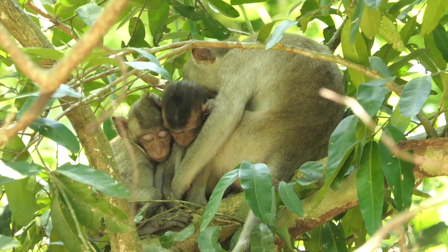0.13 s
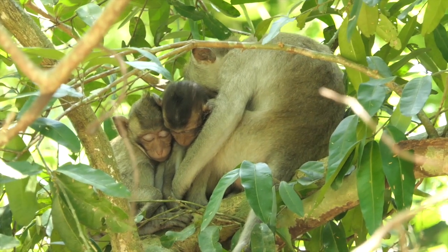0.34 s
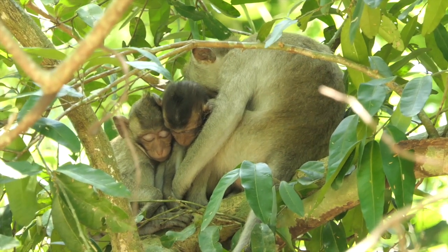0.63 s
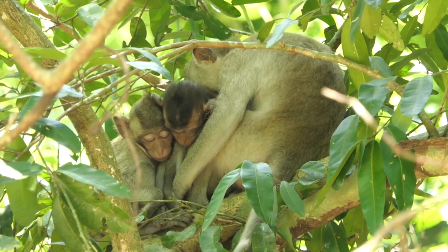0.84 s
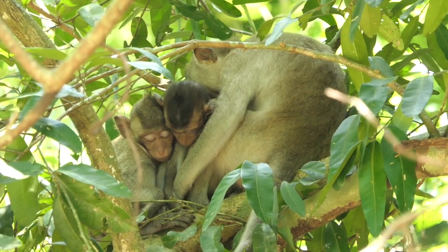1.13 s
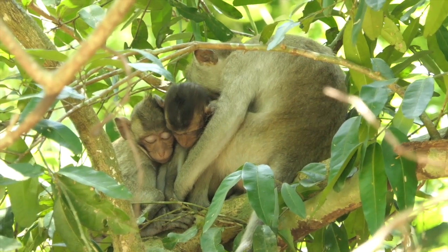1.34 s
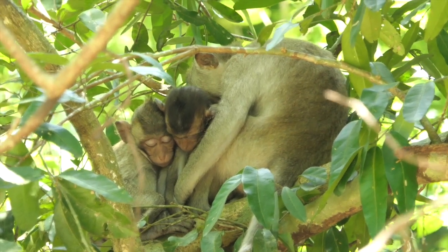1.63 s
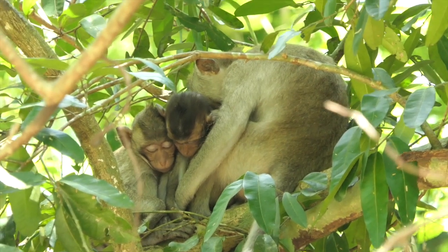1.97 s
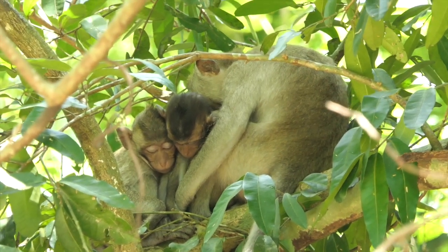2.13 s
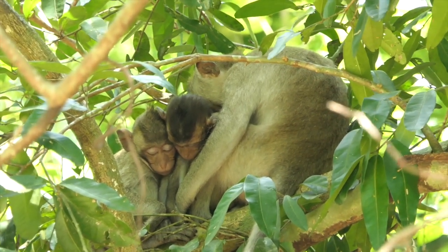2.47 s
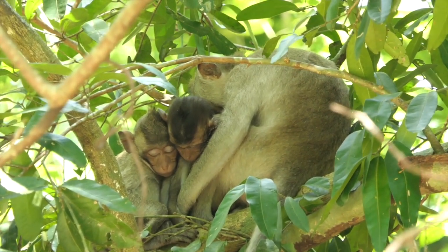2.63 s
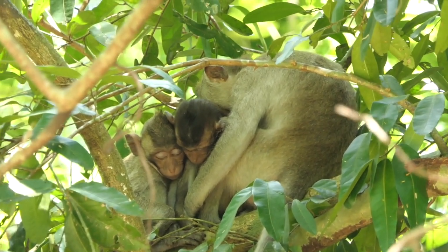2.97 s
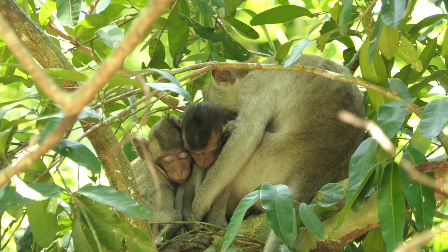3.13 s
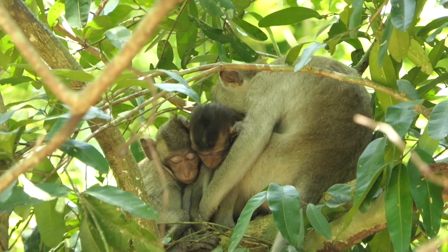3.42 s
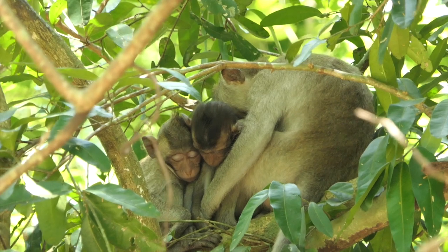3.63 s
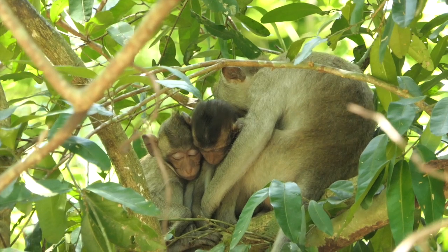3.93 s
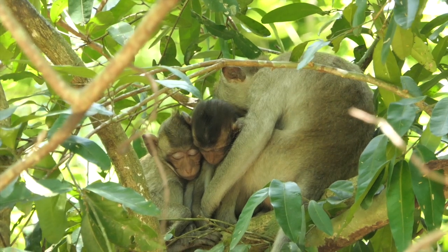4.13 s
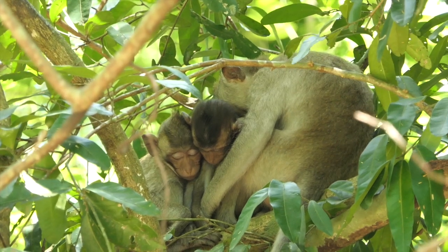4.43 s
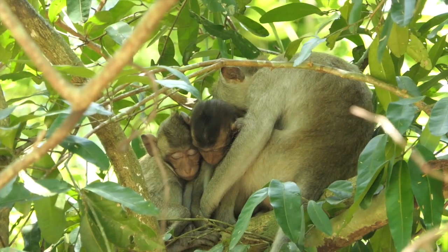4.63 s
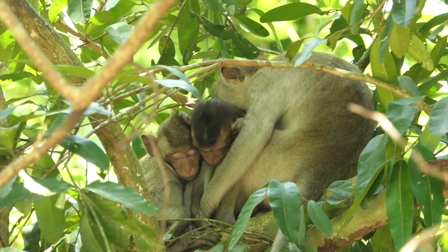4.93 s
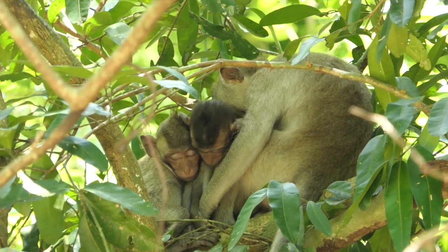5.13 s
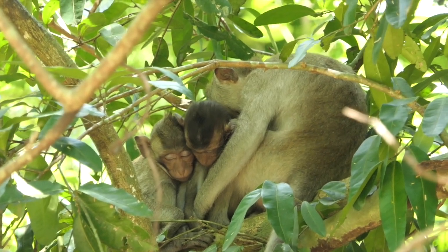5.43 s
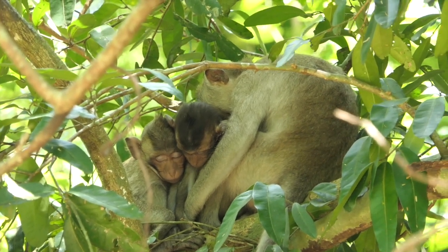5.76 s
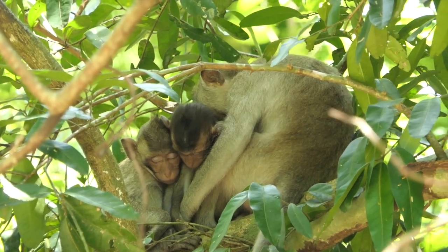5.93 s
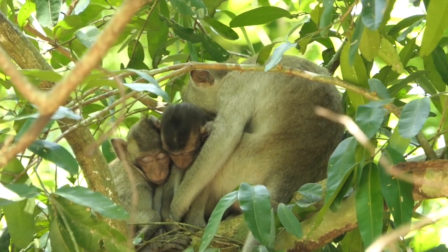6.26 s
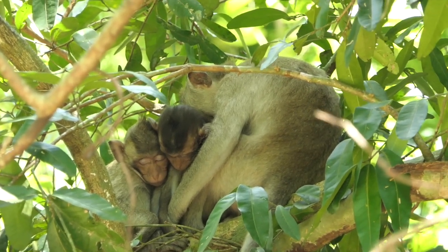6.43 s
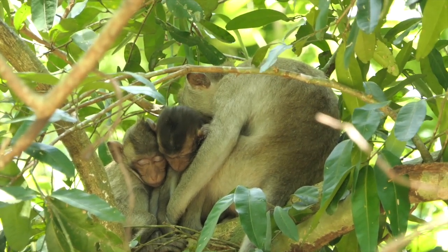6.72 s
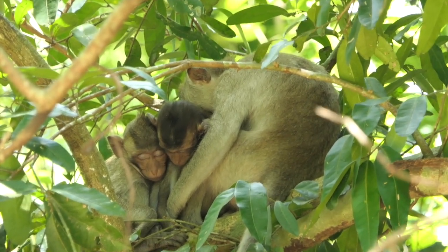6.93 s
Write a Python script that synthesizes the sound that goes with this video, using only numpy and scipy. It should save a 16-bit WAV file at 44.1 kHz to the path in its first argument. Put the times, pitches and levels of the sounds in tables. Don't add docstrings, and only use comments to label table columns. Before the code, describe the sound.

In a leafy wood, far small birds give quick, pure whistles and chirps blurred by echoes, densest in the first half. Leaves rustle harder around the middle, twigs crack nearby, and a bird flutters by on whirring wings, then another farther off. A soft hiss and low distant road rumble continue underneath. The microphone hears a narrow, nearly mono image.

```python
import sys
import numpy as np
from scipy import signal
from scipy.fft import rfft, irfft, next_fast_len
from scipy.io import wavfile
from scipy.ndimage import uniform_filter1d

SR = 44100
rng = np.random.default_rng(int(sys.argv[2]) if len(sys.argv) > 2 else 0)


def magnitude_from_level(level_db):
    exponent = np.asarray(level_db, float) / 20
    return 10 ** exponent


def to_wav(s):
    ch = np.atleast_2d(s).T
    pcm = np.round(np.clip(ch, -1, 1) * 32767)
    wavfile.write(sys.argv[1], SR, pcm.astype(np.int16))


N = 312669


def read(points, hz):
    f, value = np.transpose(points)
    return np.interp(np.log(hz + 1), np.log(f + 1), value)


def curve(rows, column, t):
    rows = np.array(rows)
    return np.interp(t, rows[:, 0], rows[:, column])


def evened(x):
    return x / np.sqrt(np.mean(x ** 2) + 1e-20)


def add(mix, s, sound):
    part = mix[round(s * SR):][:len(sound)]
    part += sound[:len(part)]


def colour(x, points):
    size = next_fast_len(len(x), True)
    gain = magnitude_from_level(read(points, np.fft.rfftfreq(size, 1 / SR)))
    return irfft(rfft(x, size) * gain, size)[:len(x)]


def resonate(x, modes):
    out = np.zeros(len(x))
    for hz, width, db in modes:
        b, a = signal.iirpeak(hz, hz / width, SR)
        once = signal.lfilter(b, a, x)
        out += magnitude_from_level(db) * signal.lfilter(b, a, once)
    return out


def noise_band(samples, modes):
    return evened(resonate(rng.standard_normal(samples), modes))


def slow_noise(count, size):
    return evened(uniform_filter1d(rng.standard_normal(count), size=size))


def hiss(points, patchy_db, flicker_db):
    frames = N // 128 + 6
    a, b, patches = rng.standard_normal((frames, 257, 3)).T
    patches = uniform_filter1d(patches, size=7, axis=0)
    patches = evened(uniform_filter1d(patches, size=24, axis=1))
    flicker = slow_noise(frames, 6)
    z = (a + 1j * b) * magnitude_from_level(patchy_db * patches + flicker_db * flicker)
    noise = signal.istft(z, nperseg=512, noverlap=384)[1][:N]
    return evened(colour(noise, points))


# f/Hz, level/dB
STILL = [(18, -65), (30, -23), (107, 7), (180, -1), (216, 0.5), (279, -24), (353, -19), (446, -25),
         (507, -8), (675, -18.5), (922, -13.5), (1400, -33), (1960, -20), (9280, -42), (14800, -73)]


def still_air():
    return magnitude_from_level(-54) * hiss(STILL, patchy_db=0.6, flicker_db=2.0)


# t/s, level/dB
GUST = [(0.0, -58), (0.6, -61.5), (1.09, -60), (1.5, -60.5), (1.83, -57), (2.05, -61.5), (2.27, -53),
        (2.39, -58.5), (2.8, -57), (3.06, -49.5), (3.3, -51), (3.45, -47.5), (3.85, -48), (4.23, -54),
        (4.5, -50), (5.49, -54.5), (6.0, -54.5), (7.09, -59.5)]
CALM_DB = -60.5


def gust(t):
    return curve(GUST, 1, t)


# t/s, level/dB
TRAFFIC = [(0.0, -50), (0.35, -58.5), (0.57, -51), (0.85, -58), (1.66, -52), (2.07, -46.5), (2.55, -52),
           (2.8, -65), (3.45, -58), (3.75, -49), (4.09, -61), (4.32, -53), (4.88, -59), (5.29, -56.5),
           (5.65, -51.5), (5.88, -54.5), (6.15, -52), (7.09, -50)]
# t/s, f/Hz, level/dB
DRONES = [
    [(2.2, 112.8, -61), (2.45, 110.6, -64), (2.75, 108.9, -54), (2.85, 109, -87)],
    [(4.6, 119.1, -66), (4.9, 119.8, -61), (5.2, 118.8, -59), (5.45, 117.2, -68)],
]
ROAR_DB, ROAR_FOLLOW, RUMBLE_DB, RUMBLE_FOLLOW = -68, 1.87, -53.5, 0.49


def road():
    t = np.arange(N) / SR
    tyres = noise_band(N, [(917, 210, 3.0), (1504, 400, -8.0)])
    roar = noise_band(N, [(550, 300, 3.8), (702, 210, 1.5)])
    rumble = noise_band(N, [(120.0, 124, -3.5), (152, 30, -2.0), (233.0, 115, -2.5)])
    above_calm = gust(t) - CALM_DB
    out = magnitude_from_level(curve(TRAFFIC, 1, t) - 10.0) * tyres
    out += magnitude_from_level(RUMBLE_DB + RUMBLE_FOLLOW * above_calm - 5.5) * rumble
    out += magnitude_from_level(ROAR_DB + ROAR_FOLLOW * above_calm - 15.0) * roar
    wobble = slow_noise(N, 3000)
    for rows in DRONES:
        turns = np.cumsum(curve(rows, 1, t) * (1 + 0.0126 * wobble)) / SR
        hum = np.sin(2 * np.pi * turns)
        hum += 2.13 * np.sin(4 * np.pi * turns)
        hum += 0.83 * np.sin(6 * np.pi * turns)
        running = (t > rows[0][0]) * (t < rows[-1][0])
        out += magnitude_from_level(curve(rows, 2, t)) * hum * running
    return out


# f/Hz, level/dB
LEAVES = [(760, -81), (1300, -18.5), (1550, -18.5), (2060, -4), (2420, -6), (2730, 0), (3250, -4.5),
          (3600, -5.5), (4500, 1.5), (5030, -4), (5920, -4.5), (8290, -12), (9360, -6), (13500, -21.5),
          (14800, -38)]
BIG_LEAVES_DB, BIG_FOLLOW = -1, 0.17
BIG_SETTLE_S, BIG_SETTLE_DB_PER_S = 6.3, 10.5


def leaves():
    t = np.arange(N) / SR
    strength = magnitude_from_level(1.07 * np.minimum(rng.exponential(1, N), 4))
    happens = rng.random(N) < 700 / SR
    crackle = colour(strength * happens * rng.choice([-1, 1], N), LEAVES)
    rustle = evened(hiss(LEAVES, patchy_db=1.1, flicker_db=0.9) + 0.4 * evened(crackle))
    big = signal.sosfiltfilt(signal.butter(3, 3300, fs=SR, output='sos'), rustle)
    small = rustle - big
    big_db = BIG_LEAVES_DB + BIG_FOLLOW * (gust(t) - CALM_DB)
    big_db -= BIG_SETTLE_DB_PER_S * np.maximum(t - BIG_SETTLE_S, 0)
    return magnitude_from_level(gust(t) + 7.5) * (small + magnitude_from_level(big_db) * big)


# f/Hz, t/s
WOOD = [(1500, 0.71), (3500, 1), (5500, 1), (9000, 0.49)]


def wood(x):
    t, out = np.arange(N) / SR, np.zeros(N)
    for k in range(3):
        taps = np.zeros(SR // 2)
        at = np.arange(100, len(taps) - 20, 20)
        taps[at + rng.integers(0, 20, len(at))] = rng.choice([-1., 1.], len(at))
        hz, s, z = signal.stft(taps, SR, nperseg=128)
        trunks = magnitude_from_level(-60 * s / read(WOOD, hz)[:, None])
        foliage = 1.9 * magnitude_from_level(-60 * s / .23)
        tail = signal.istft(z * (trunks + foliage), SR, nperseg=128)[1]
        turn = np.sqrt(2 / 3) * np.cos(np.pi * (t * 6.3 + k / 3))
        out += signal.oaconvolve(x * turn, tail / np.linalg.norm(tail))[:N]
    return out


# t/s, peak level/dB, low part level/dB (relative), tail fade t/s
TICKS = [(0.116, -28, -6, 0.15), (0.438, -21.5, -0.5, 0.05), (0.9284, -25, 5, 0.12), (1.04, -26, -4, 0.048),
         (1.08, -26, -13, 0.28), (2.164, -26, -1, 0.14), (2.872, -25, 2, 0.24), (3.365, -21, 1, 0.15),
         (3.3917, -11.5, -4.5, 0.2), (3.719, -18, 0, 0.56), (3.751, -31, 7, 0.23), (3.8374, -43, -4, 0.12),
         (4.0979, -12, -7, 0.32), (4.27, -21, -2, 0.15), (4.302, -23, 1, 0.29), (4.4115, -24, -1, 0.12),
         (4.4863, -18.5, 1, 0.089), (5.336, -48, 3, 0.087), (5.797, -30, -15, 0.13), (5.975, -23, -3, 0.49),
         (6.2576, -25.5, -6, 0.45)]
# t/s, peak level/dB, ring f/Hz
KNOCKS = [(1.072, -38, 5260), (1.576, -43, 2560), (1.915, -41.5, 3200), (2.507, -44.5, 2420),
          (2.7, -46.5, 1250), (2.9, -56, 950), (3.522, -38, 276), (3.526, -52, 468), (4.1, -41, 2600),
          (4.115, -50.5, 730), (4.132, -45, 2600), (4.3, -47, 4260), (4.31, -47, 630), (5.337, -47, 3500),
          (1.72, -47, 3640), (5.871, -47, 3450), (6.02, -47, 3500), (6.65, -50, 4600)]
# t/s, peak level/dB, ring f/Hz
SNAP = (5.5988, -17.5, 3200)


def twigs():
    out, t = np.zeros(N), np.arange(6000) / SR
    rise = np.minimum(t / 0.0025, 1)
    for s, db, low_db, t60 in TICKS:
        shape = rise * (magnitude_from_level(-60 * t / 0.013) + 0.26 * magnitude_from_level(-60 * t / t60))
        noise = rng.standard_normal(len(t))
        high = evened(resonate(noise, [(8630, 5100, 14.6), (6300, 830, 17.2)]))
        low = evened(resonate(noise, [(2650, 540, 0.53), (4200, 1200, -2.0)]))
        add(out, s, magnitude_from_level(db - 15.0) * shape * (high + magnitude_from_level(low_db + 2.5) * low))
    for s, db, hz in KNOCKS:
        fade = magnitude_from_level(db - 60 * t / (0.076 + 14 / hz))
        add(out, s, fade * rise * noise_band(len(t), [(hz, .5 * hz, 0)]))
    s, db, hz = SNAP
    fade = magnitude_from_level(db - 60 * t / 0.0026) * (1 - np.exp(-t / 0.00015))
    add(out, s, fade * np.sin(2 * np.pi * hz * t))
    return out


# t/s, peak whirr level/dB
BEATS = [(3.5141, -41), (3.565, -34), (3.62, -31), (3.678, -28), (3.7338, -24.5), (3.7763, -24.5),
         (3.8274, -24.5), (3.8892, -29.5), (3.9474, -38.5), (3.9943, -59), (4.056, -58)]
# f/Hz, width f/Hz, level/dB
FEATHERS = [(2010, 410, 1.5), (2800, 490, 3.5), (1490, 520, -9)]
# f/Hz, width f/Hz, level/dB
FAR_FEATHERS = [(2850, 400, 5), (2150, 330, -8)]
# f/Hz, width f/Hz, level/dB
PUFF = [(326, 86, -10.5), (634, 122, -15.5), (763, 41, -17)]
FAR_FIRST_S, FAR_BEAT_S, FAR_COUNT = 5.39, .0527, 13
FAR_CLOSEST_S, FAR_PASS_S, FAR_DB = 5.7, 0.2, -34.5
PUFF_DB, FAR_PUFF_DB, PUFF_FOLLOW = -7, -17, -0.76


def wings():
    out, t = np.zeros(N), np.arange(2600) / SR
    stroke = np.minimum(t / 0.0036, 1) * np.exp(-(t / 0.03) ** 2)
    far_s = FAR_FIRST_S + FAR_BEAT_S * np.arange(FAR_COUNT)
    far_db = FAR_DB - 20 * np.log10(1 + ((far_s - FAR_CLOSEST_S) / FAR_PASS_S) ** 4)
    near_bird = (BEATS, FEATHERS, PUFF_DB)
    far_bird = (zip(far_s, far_db), FAR_FEATHERS, FAR_PUFF_DB)
    for beats, feathers, puff_db in (near_bird, far_bird):
        for s, db in beats:
            whirr = noise_band(len(t), feathers)
            puff = noise_band(len(t), PUFF)
            puff_gain = magnitude_from_level(puff_db + 1.5 + PUFF_FOLLOW * (db + 30.5))
            add(out, s, magnitude_from_level(db - 9.5) * stroke * (whirr + puff_gain * puff))
    return out


def whistle(hz, db):
    return magnitude_from_level(db) * np.sin(2 * np.pi * np.cumsum(hz) / SR) * signal.windows.tukey(len(hz), .6)


# t/s, length t/s, start f/Hz, end f/Hz, level/dB
RISES = [(0.083, 0.063, 5270, 5980, -34.5), (.11, 0.12, 3195, 3520, -40), (0.205, 0.018, 4700, 5050, -50),
         (0.397, 0.062, 3410, 4010, -33.5), (1.015, 0.022, 1700, 1900, -48), (1.02, 0.065, 3594, 4164, -34),
         (1.697, 0.031, 3550, 3900, -46), (3.22, 0.032, 3490, 3640, -42), (3.4, 0.073, 4950, 5250, -45),
         (2.414, 0.037, 3570, 4060, -36), (2.478, 0.015, 4700, 5750, -37), (2.47, 0.013, 3980, 4520, -29),
         (2.771, 0.0515, 2504, 2856, -42), (3.142, 0.11, 2610, 3010, -42), (3.255, 0.028, 2545, 2890, -40),
         (3.292, 0.052, 3200, 3750, -41), (3.555, 0.078, 4980, 5880, -37), (6.865, 0.014, 3920, 4520, -48)]
# t/s, length t/s, start f/Hz, end f/Hz, level/dB
FALLS = [(0.001, 0.0085, 5740, 5240, -22.5), (0.197, 0.11, 3724, 3390, -39.5),
         (0.408, 0.032, 4750, 4550, -32.5), (.55, 0.094, 3075, 2410, -45.5), (.62, 0.014, 6300, 5040, -35),
         (0.78, 0.041, 2800, 2387, -40), (0.906, 0.045, 3855, 3690, -38), (0.927, 0.023, 2870, 2386, -41.5),
         (1.088, 0.042, 4180, 3934, -36), (2.182, 0.024, 5500, 5150, -41.5), (6.866, .03, 5450, 4800, -42),
         (6.874, 0.013, 7000, 5600, -43), (2.534, 0.013, 5564, 5000, -30), (0.95, 0.0397, 3620, 3000, -38),
         (0.985, 0.02, 3180, 3090, -31.5), (1.575, 0.074, 6000, 5780, -37.5),
         (1.955, 0.0234, 3980, 3150, -41), (2.045, 0.075, 3230, 3070, -35.5),
         (2.086, 0.024, 2910, 2720, -38), (2.162, 0.009, 5820, 4970, -37),
         (2.371, 0.0427, 3880, 3400, -32.5), (.82, 0.079, 2784, 2725, -47.5),
         (3.59, 0.063, 5910, 5660, -34.5), (4.91, 0.029, 6340, 6050, -42), (5.134, 0.031, 4360, 3820, -43),
         (5.225, 0.017, 6540, 5900, -41)]
# t/s, length t/s, f/Hz, level/dB
PIPS = [(0.218, 0.022, 5124, -27.5), (0.347, 0.048, 3420, -34), (0.607, 0.034, 5950, -35),
        (0.736, 0.045, 2806, -42.5), (0.946, 0.027, 3760, -37), (0.95, 0.017, 2486, -41.5),
        (.94, 0.024, 2830, -41), (1.078, 0.031, 1884, -54.5), (1.074, 0.038, 3090, -45),
        (1.175, 0.015, 1675, -49), (1.181, 0.014, 3260, -37.5), (1.443, 0.018, 2930, -44),
        (1.509, 0.031, 6060, -33), (1.542, 0.053, 6040, -39.5), (1.602, 0.0057, 5930, -32),
        (1.617, 0.009, 5880, -41), (1.639, 0.011, 5700, -40), (1.799, 0.03, 5420, -32.5),
        (1.846, 0.033, 5343, -35), (1.893, 0.025, 5350, -36), (1.941, 0.045, 3994, -38),
        (1.991, 0.042, 3090, -38), (2.21, 0.027, 3230, -33), (0.631, 0.055, 2752, -47.5),
        (2.242, 0.072, 2960, -50), (2.34, 0.031, 2950, -47.5), (0.249, .024, 5085, -36),
        (2.94, 0.046, 2804, -41), (4.202, 0.03, 3590, -46.5), (4.323, 0.037, 5500, -46),
        (4.385, 0.051, 3716, -45), (4.813, 0.016, 3760, -41), (3.41, .025, 3980, -43),
        (4.61, .025, 4200, -52), (5.129, 0.085, 6430, -46), (6.636, 0.021, 2583, -50.5),
        (6.875, 0.041, 4820, -47.5)]
# t/s, length t/s, start f/Hz, end f/Hz, level/dB
BURRS = [(.001, 0.094, 5230, 5150, -42), (.001, 0.062, 6460, 6160, -40), (0.023, 0.054, 5720, 5790, -43),
         (0.087, 0.069, 6500, 6300, -48), (1.737, 0.031, 3560, 4160, -43), (4.787, 0.0294, 6260, 5880, -42),
         (6.752, 0.061, 5830, 4800, -47), (6.866, 0.057, 6850, 6500, -49), (6.882, 0.034, 5880, 5670, -44),
         (1.374, 0.043, 2345, 2920, -43.5), (1.744, 0.065, 4596, 5346, -33.5),
         (2.473, 0.031, 4590, 5294, -31), (2.495, 0.021, 4930, 4900, -41),
         (2.528, 0.062, 5250, 5200, -36.5), (2.615, 0.092, 5350, 5700, -38),
         (2.676, 0.058, 5760, 5630, -31.5), (3.697, 0.037, 5140, 5170, -35),
         (4.909, 0.074, 2800, 2970, -46.5), (5.04, 0.066, 2944, 2800, -45), (5.892, 0.033, 5430, 4850, -47),
         (6.665, 0.13, 6950, 6870, -48.5), (6.755, 0.089, 6910, 6610, -44.5),
         (6.85, 0.074, 6300, 6200, -43)]
# length t/s, start f/Hz, end f/Hz, level/dB
RASP = (0.08, 5900, 5752, -41)
RISE_EASE, FALL_EASE, PIP_EASE = 1.395, 1.233, 0.46
PIP_SAG = .015
SWELL_DB = 3
SHAKE_HZ, SHAKE_PER_GLIDE, RASP_SHAKE_HZ = 138, 0.076, 640


def birds():
    out = np.zeros(N)
    waver = slow_noise(N, 150)
    pips = [(s, length, hz, hz * (1 - PIP_SAG), db) for s, length, hz, db in PIPS]
    kinds = ((RISES, RISE_EASE, SWELL_DB), (FALLS, FALL_EASE, 0), (pips, PIP_EASE, 0))
    for notes, ease, swell_db in kinds:
        for s, length, start_hz, end_hz, db in notes:
            u = np.arange(round(length * SR)) / (length * SR)
            hz = end_hz + (start_hz - end_hz) * (1 - u) ** ease
            hz += 15 * waver[round(s * SR) + 999:][:len(u)]
            add(out, s, whistle(hz, db + swell_db * (u - 1.0)))
    burrs = [(*row, SHAKE_HZ + SHAKE_PER_GLIDE * abs(row[3] - row[2])) for row in BURRS]
    for s, length, start_hz, end_hz, db, shake_hz in burrs + [(0, *RASP, RASP_SHAKE_HZ)]:
        count = round(length * SR)
        turns = 110 * np.arange(count) / SR + 0.088 * waver[round(s * SR):][:count]
        hz = np.linspace(start_hz, end_hz, count) + shake_hz * np.sin(2 * np.pi * turns)
        add(out, s, whistle(hz, db))
    return out * magnitude_from_level(2.14 * waver)


# f/Hz, side minus mid level/dB
PORT_GAP = [(60, -51), (95, -49), (150, -42), (240, -24.5), (370, -22.5), (590, -12.5), (900, -29),
            (1200, -14), (1600, -25), (2340, -31.5), (3690, -33.5), (5840, -44), (9230, -24.5), (14600, 12)]


def two_ports(mid):
    hz, s, z = signal.stft(mid, SR, nperseg=512)
    scatter = np.exp(2j * np.pi * rng.random(z.T.shape)).T
    lean = -.12 * np.clip(hz / 12000, 0, 1) ** 4
    gap = magnitude_from_level(read(PORT_GAP, hz) - 1)
    side = signal.istft(z * (lean[:, None] + scatter * gap[:, None]), SR, nperseg=512)[1][:N]
    return np.array([mid + side, mid - side])


def scene():
    air = still_air() + road() + leaves()
    near = twigs() + wings()
    far = birds()
    echoes = wood(magnitude_from_level(-1.83) * far + magnitude_from_level(-10) * near)
    return two_ports(magnitude_from_level(-3.5) * far + near + echoes + air)


def top_cut(x):
    return signal.sosfilt(signal.butter(12, 15190, fs=SR, output="sos"), x)


def record(dry):
    dry = signal.sosfilt(signal.butter(2, 45, 'high', fs=SR, output='sos'), dry)
    dry = signal.sosfilt(signal.butter(8, 14300, fs=SR, output='sos'), dry)
    b, a = signal.iirnotch(3180, 10, SR)
    mix = 0.33 * dry + 0.66 * signal.lfilter(b, a, dry)
    return top_cut(mix)


dry = scene()
out = record(dry)
to_wav(out)
```